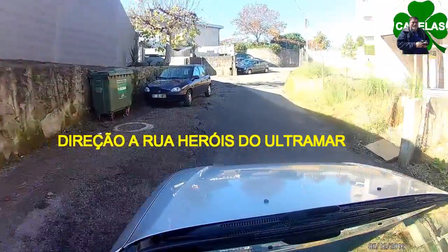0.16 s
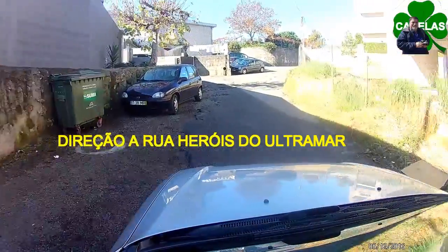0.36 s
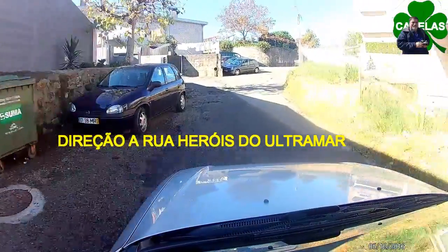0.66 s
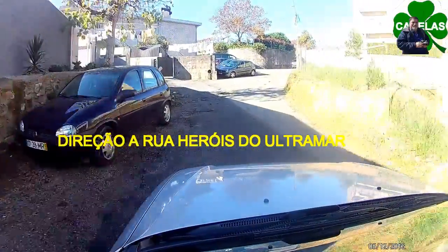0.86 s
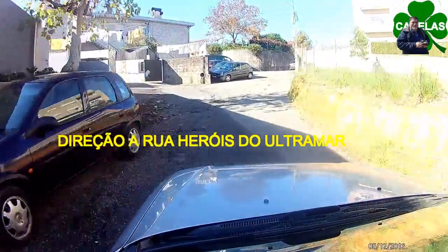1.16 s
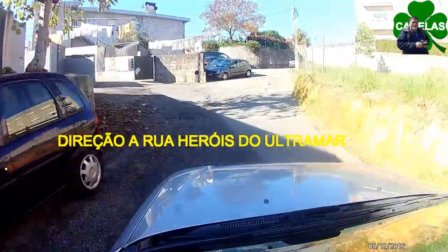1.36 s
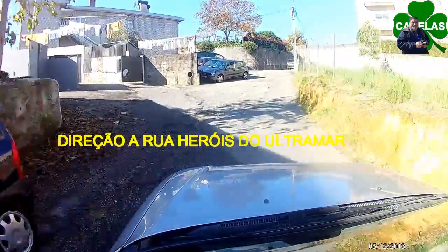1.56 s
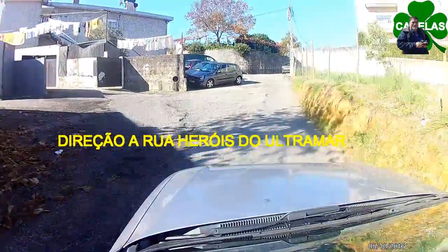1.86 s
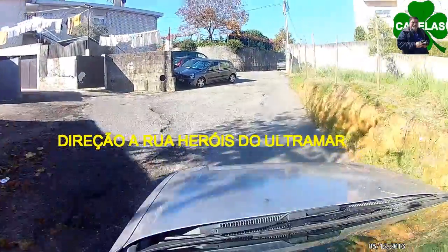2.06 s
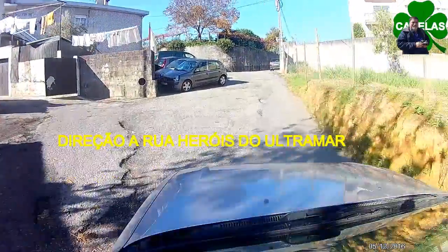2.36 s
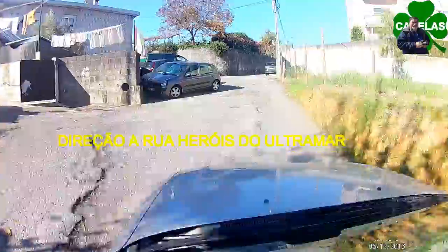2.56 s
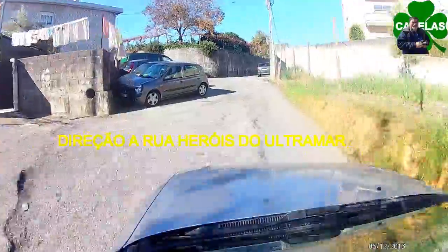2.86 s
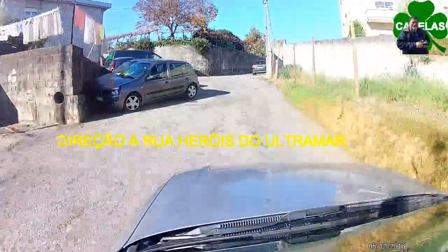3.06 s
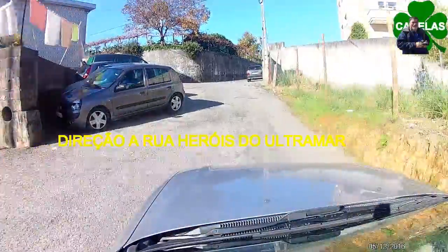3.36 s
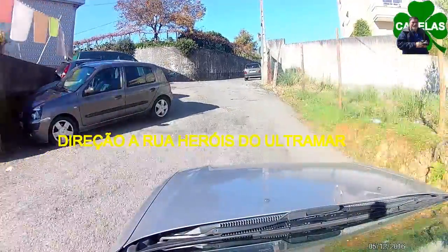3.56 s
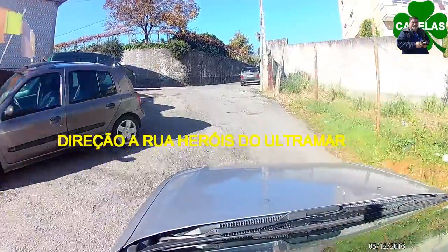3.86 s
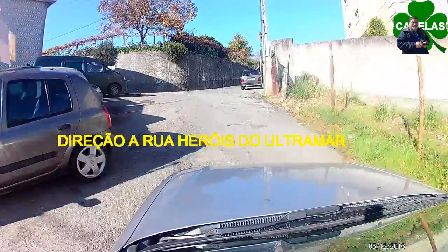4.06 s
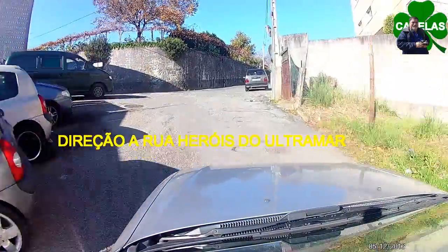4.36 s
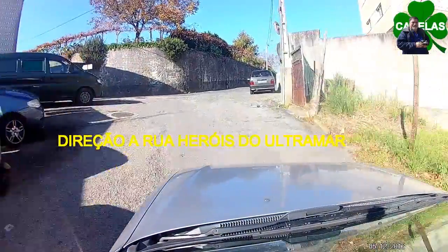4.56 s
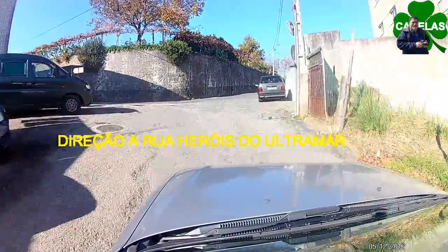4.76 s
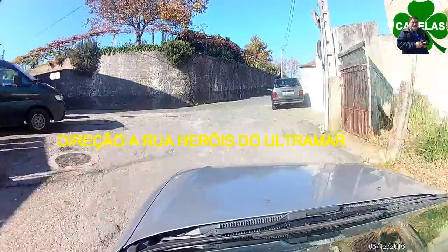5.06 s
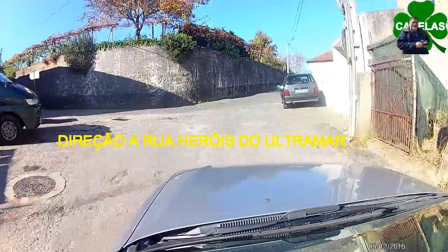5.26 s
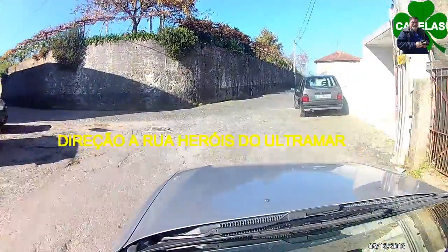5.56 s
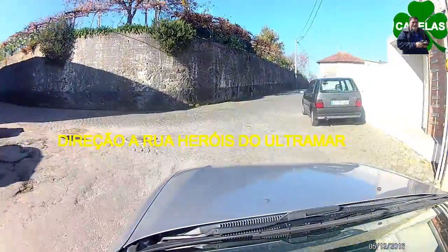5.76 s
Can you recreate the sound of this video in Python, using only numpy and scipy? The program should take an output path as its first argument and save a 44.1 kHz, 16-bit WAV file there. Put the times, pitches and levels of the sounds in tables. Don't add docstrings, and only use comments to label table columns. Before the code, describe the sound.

A car rolls slowly over rough paving, tyres drumming low and loud at first, then quieter, with bumps, rattles and one sharp plastic snap.

```python
import sys
import numpy as np
from scipy import signal
from scipy.fft import rfft, irfft, next_fast_len
from scipy.io import wavfile
from scipy.ndimage import uniform_filter1d, map_coordinates

SR = 44100
rng = np.random.default_rng(int(sys.argv[2]) if len(sys.argv) > 2 else 0)


def elevation(decibels):
    levels = np.asarray(decibels, float)
    return 10 ** (levels / 20)


def store_wav(level_fs):
    pcm = np.round(np.clip(np.atleast_2d(level_fs), -1, 1) * 32767)
    wavfile.write(sys.argv[1], SR, pcm.T.astype(np.int16))


N = 261513

# start_s, level_db
SNAP_BLOWS = [
    (5.0808, -5),
    (5.0827, -17),
]


def unit(x):
    return x / np.sqrt(np.mean(x ** 2) + 1e-20)


def along(points, hz):
    f, v = np.transpose(points)
    return np.interp(np.log(hz + 1), np.log(f + 1), v)


def wobble(rate_hz):
    knots = rng.standard_normal(int(N * rate_hz / SR) + 4)
    return map_coordinates(knots, [np.arange(N) * rate_hz / SR])


def filtered(x, response):
    m = next_fast_len(N + 8192)
    return irfft(rfft(x, m) * response(np.fft.rfftfreq(m, 1 / SR)), m)[:N]


def coloured(x, spectrum):
    return filtered(x, lambda hz: elevation(along(spectrum, hz)))


def narrow_noise(centre_hz, width_hz):
    noise = rng.standard_normal(N)
    return unit(filtered(noise, lambda hz: np.exp(-((hz - centre_hz) / width_hz) ** 2)))


def puffs(events):
    t = np.arange(N) / SR
    return sum(height * np.sin(np.pi * np.clip((t - s) / length, 0, 1)) for s, length, height in events)


def self_noise():
    # hz, level_db
    noise_spectrum = [(3000, -10.5), (7200, -7), (8800, 1), (11500, -1), (12500, -9), (13300, -6),
                      (15700, -9)]
    return elevation(-72) * unit(coloured(rng.standard_normal(N), noise_spectrum))


def ticks():
    # from_s, lag_s
    usual_lags = [(.05, .0445), (2.4, .055), (4.75, .048)]
    cycle_s, early_s, early_share, skip_share = .05, .035, .3, .05
    since_s, lag_s = np.transpose(usual_lags)
    starts = np.arange(since_s[0], N / SR, cycle_s)
    luck = rng.random(len(starts))
    shift, size = rng.standard_normal((len(starts), 2)).T
    usual_s = lag_s[np.searchsorted(since_s, starts + cycle_s / 2) - 1]
    start_s = starts + np.where(luck < early_share, early_s, usual_s) + .001 * shift
    peak_db = -62 + 1.7 * size
    return np.transpose([start_s, peak_db])[luck < 1 - skip_share]


def blips(events, hz, width_hz):
    gate, t = np.zeros(N), np.arange(N) / SR
    for s, db in events:
        length_s = 0.014 * elevation(.6 * (db + 63.5))
        gate += elevation(db - 5) * np.sin(np.pi * np.clip((t - s + .003) / length_s, 0, 1))
    buzz = np.sin(2 * np.pi * hz * t + 1.1 * np.sin(2 * np.pi * 200 * t))
    return gate * (.6 * buzz + .9 * narrow_noise(hz, width_hz))


def circuit_leak():
    # start_s, peak_db
    low_blips = [
        (2.5, -58),
        (2.553, -63),
        (4.08, -64),
        (4.095, -58),
        (5.63, -60),
        (5.695, -65),
    ]
    cycle = ticks()
    leak = blips(cycle, hz=9600, width_hz=300) + blips(low_blips, hz=9250, width_hz=250)
    return leak + elevation(-17) * blips(cycle, hz=12850, width_hz=300)


def snap():
    # mode_hz, peak_db, rise_s
    case_modes = [(1500, -5, .0007), (2350, -5.5, .0007), (4400, -6.5, .00045), (6500, -21, .0005),
                  (8800, -34, .0009), (10100, -33, .0006), (11300, -25, .0006), (12300, -33, .0006),
                  (14100, -42, .0006)]
    out, t = np.zeros(N), np.arange(SR // 50) / SR
    ring = np.zeros(len(t))
    for hz, db, rise_s in case_modes:
        envelope = (t / rise_s * np.exp(1 - t / rise_s)) ** 2
        ring += elevation(db) * envelope * np.sin(2 * np.pi * hz * t)
    for s, db in SNAP_BLOWS:
        out[round(s * SR):][:len(t)] += elevation(db) * ring
    return out


def squeaks():
    # start_s, length_s, pitch_hz, width_hz, level_db
    rubs = [
        (.622, .025, 5900, 250, -48),
        (1.865, .1, 6900, 250, -63),
        (2.68, .12, 6340, 350, -61),
        (2.7, .1, 6750, 300, -70),
        (2.86, .17, 6500, 600, -63.5),
        (4.2, 0.26, 6460, 500, -66),
        (4.66, .18, 6660, 450, -60),
    ]
    out = np.zeros(N)
    for s, length_s, hz, width_hz, db in rubs:
        out += puffs([(s, length_s, elevation(db))]) * narrow_noise(hz, width_hz)
    return out


def rattle():
    # start_s, length_s, level_db
    chatter = [(0.119, .008, -56), (0.156, 0.017, -57.5), (0.173, .01, -58), (0.206, .1, -56),
               (.415, .015, -58.5), (0.578, .12, -61.5), (0.629, .025, -56), (0.682, .01, -54),
               (.972, .012, -54), (1.055, .008, -58), (1.105, 0.0097, -59.5), (2.089, .015, -67),
               (4.403, .025, -57.5), (4.675, .008, -62), (5.038, .008, -56), (5.06, 0.02, -53),
               (5.117, .006, -63)]
    # hz, density_db
    bright_spectrum = [(3500, -34), (5000, 0), (7000, -0.5), (11000, -8), (12500, -14.5), (16000, -19.5)]
    bursts = puffs([(s, length_s, elevation(db)) for s, length_s, db in chatter])
    return bursts * unit(coloured(rng.standard_normal(N), bright_spectrum))


def bumps():
    # start_s, peak_db, mode_hz, rise_s, t60_s
    wheel_bumps = [(0.601, -1.5, 111, 0.033, 0.38), (.95, -1, 113.6, 0.011, 0.17),
                   (1.03, -2, 55.8, 0.024, 0.35), (1.801, -12.5, 51.9, .03, 0.81),
                   (1.99, -16, 52, 0.024, 0.1), (3.271, -9.5, 100.5, 0.074, 0.83),
                   (4.037, -8.5, 77, 0.046, 0.36), (4.64, -11.5, 111.7, 0.03, 0.68),
                   (5.03, 3, 54, 0.083, 0.48), (5.03, -2.5, 99.6, 0.03, 0.38), (5.11, -7.5, 95.7, .02, .25)]
    out, t = np.zeros(N + SR), np.arange(SR // 2) / SR
    for s, db, hz, rise_s, t60_s in wheel_bumps:
        swell = (1 - np.exp(-t / rise_s)) * elevation(db + 3.0 - 60 * t / t60_s)
        out[round(s * SR):][:len(t)] += swell * np.sin(2 * np.pi * hz * t)
    return out[:N]


def grit():
    # start_s, length_s, over_hiss_db
    crunches = [(.15, 0.018, 3.5), (0.198, 0.033, 3), (0.23, 0.057, 4.5), (.41, 0.017, 6.5),
                (0.615, .03, 1.5), (.68, .02, 3), (0.963, 0.015, 3.5), (1.148, .015, 6.5), (1.2, 0.013, 5),
                (1.506, 0.014, -10.5), (1.573, .04, 1.5), (1.742, 0.024, 5.5), (2.09, 0.013, -7.5),
                (2.337, .012, -2), (2.583, 0.018, 6.5), (3.833, 0.014, 2.5), (4.12, .015, 7.5),
                (4.403, 0.026, 4.5), (4.46, 0.17, 2.5), (4.61, 0.017, 5), (4.725, .02, 3), (4.795, 0.03, 6),
                (4.88, .16, 2.5), (5.77, .06, 6), (5.527, 0.014, 4), (5.688, .015, 0)]
    return puffs(crunches)


def contacts(spectrum, per_second, spread_db, share, patchy_db):
    hits = rng.random(N) < per_second / SR
    blows = hits * rng.standard_normal(N) * elevation(spread_db * rng.random(N))
    z = signal.stft(rng.standard_normal(N + 512), nperseg=512)[2]
    field = uniform_filter1d(rng.standard_normal(z.shape), 6, axis=0)
    field = uniform_filter1d(field, 8, axis=1)
    rolling = signal.istft(z * elevation(patchy_db * unit(field)), nperseg=512)[1][:N]
    return unit(coloured(share * unit(blows) + unit(rolling), spectrum))


def tyres():
    # start_s, rolling_db, roughness_db
    drive = [(0, -14, 0.5), (.28, -16.5, 3), (.5, -15.5, -2), (.65, -17, 1), (.9, -18, 1), (1.07, -19.5, 2),
             (1.4, -19.5, 1), (1.85, -22.5, -1), (2.25, -26, 0), (2.9, -26.5, 0), (3.75, -22, -2),
             (4.4, -23.5, 1.5), (4.52, -26.5, -3), (4.67, -23.5, 3.5), (4.87, -23, 3), (5.07, -20, 4),
             (5.25, -22.5, 1), (5.93, -23.5, 2)]
    # start_s, length_s, body_db, tyre_db
    stones = [(0.118, 0.048, -7, -1.5), (0.222, 0.09, -0.5, 6), (0.365, .1, 3, -1.5), (.6, 0.085, 3.5, 2),
              (0.657, .04, 1, 4), (0.968, 0.043, 6, 6.5), (1.046, 0.048, -5, 3.5), (1.464, 0.065, -2, -5.5),
              (1.587, 0.025, -2, 6), (1.797, 0.11, 3, 2), (2, 0.073, 8, 2.5), (2.548, .08, 3.5, 0.5),
              (2.813, 0.034, -4, 5), (3.923, 0.095, 6, -2.5), (4.08, 0.048, -8, -1), (4.62, 0.087, 8.5, 1),
              (4.873, 0.063, -2.5, -4.5), (5.027, 0.093, -0.5, 3.5), (5.087, 0.09, -10, -0.5),
              (5.27, 0.45, 3.5, 0.5), (5.81, 0.049, 5.5, 3.5)]
    layers = {"rumble": (-18.5, .4, 1.1), "roar": (-15.5, 0.57, 0.45), "hum": (-21, 1, .1),
              "hiss": (-41.5, 1.18, 1)}
    # hz, density_db
    rumble_spectrum = [(7.1, -37), (12, -1.5), (32, -1.5), (75, -4), (108, -5), (156, -8), (200, -18),
                       (260, -36.5), (440, -120)]
    # hz, density_db
    roar_spectrum = [(65, -29.5), (110, -0.5), (177, -2), (267, -1), (545, -5.5), (601, -8.5), (755, -19),
                     (900, -20), (1170, -40), (1980, -120)]
    # hz, density_db
    hum_spectrum = [(350, -34), (600, -3.5), (708, -3.5), (1020, -3), (1160, -4), (2600, -27.5),
                    (3380, -41), (5720, -120)]
    # hz, density_db
    hiss_spectrum = [(1100, -26), (1800, -3.5), (3100, -5), (3800, -6), (4300, -12), (4900, -21),
                     (5400, -23), (6400, -23.5), (7200, -31.5), (9000, -39.5), (11300, -39), (12200, -55.5),
                     (16000, -62)]
    middle_db = -21
    t = np.arange(N) / SR
    s, strength, roughness = np.transpose(drive)
    rolling_db, rough_db = np.interp(t, s, strength), np.interp(t, s, roughness)
    rumble_db, roar_db, hum_db, hiss_db = [
        db + roll * (rolling_db - middle_db) + rough * rough_db for db, roll, rough in layers.values()]
    body_db = puffs([(s, length_s, body) for s, length_s, body, _ in stones])
    tyre_db = puffs([(s, length_s, tyre) for s, length_s, _, tyre in stones])
    paving = wobble(14)

    rumble_db = rumble_db + body_db + 0.76 * wobble(6.2)
    roar_db = roar_db + tyre_db + 0.29 * paving
    hum_db = hum_db + 0.39 * tyre_db + 0.52 * paving
    hiss_db = hiss_db + grit() + 0.65 * paving + 0.89 * wobble(35)

    rumble = elevation(rumble_db) * contacts(rumble_spectrum, 39, spread_db=0.0, share=.3, patchy_db=-1.3)
    roar = elevation(roar_db) * contacts(roar_spectrum, 400, spread_db=8.5, share=0.52, patchy_db=0.44)
    hum = elevation(hum_db) * contacts(hum_spectrum, 900, spread_db=12.0, share=0.59, patchy_db=1.55)
    hiss = elevation(hiss_db) * contacts(hiss_spectrum, 900, spread_db=7.5, share=0.74, patchy_db=1.4)
    return rumble + roar + hum + hiss


def scene():
    return (rattle() + squeaks() + bumps() + tyres())[None]


def roll_off(x):
    return signal.sosfilt(signal.butter(12, 15720, fs=SR, output="sos"), x)


def record(dry):
    clipped = dry[0] / (1 + np.abs(dry[0] / 1.05) ** 6) ** (1 / 6)
    ducked = clipped * (1 - puffs([(SNAP_BLOWS[0][0] - .004, .011, .55)]))
    fade_in = np.minimum(np.arange(N) / (.001 * SR), 1)
    heard = fade_in * ducked + snap() + self_noise()
    ported = filtered(heard, lambda hz: 1 - .76 * np.exp(-((hz - 7950) / 480) ** 2))
    return roll_off((ported + circuit_leak())[None])


dry = scene()
out = record(dry)
store_wav(out)
```